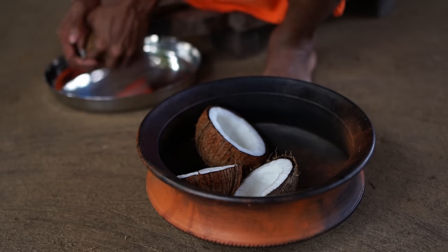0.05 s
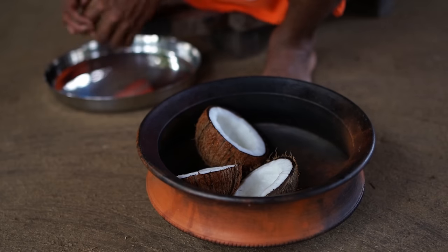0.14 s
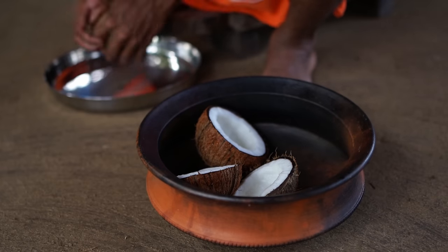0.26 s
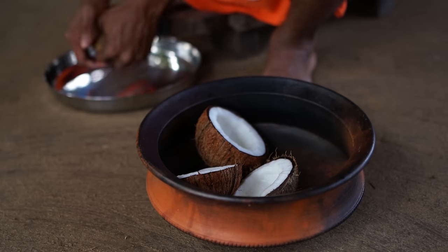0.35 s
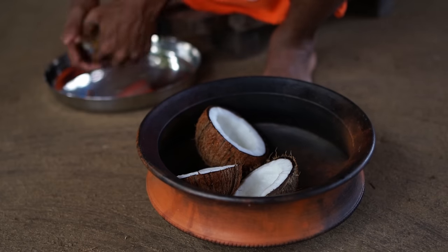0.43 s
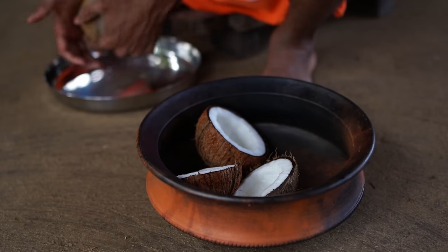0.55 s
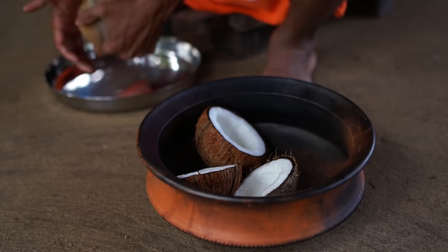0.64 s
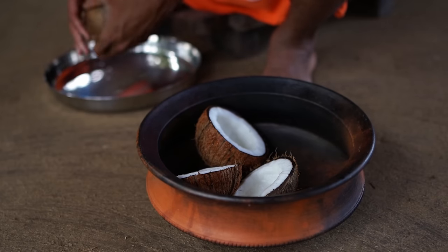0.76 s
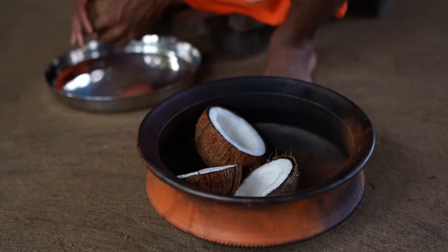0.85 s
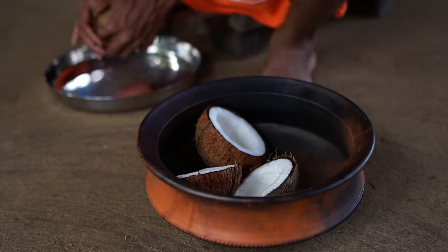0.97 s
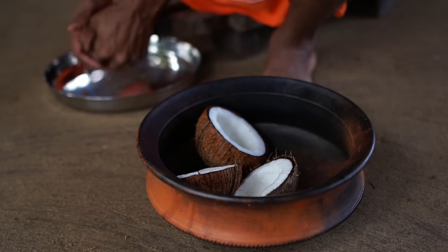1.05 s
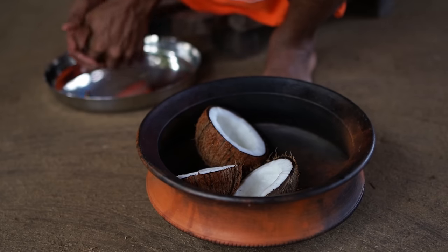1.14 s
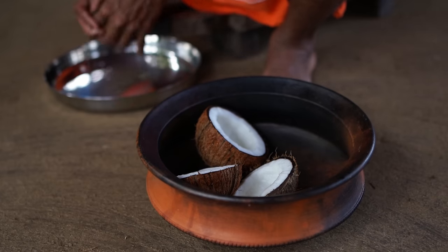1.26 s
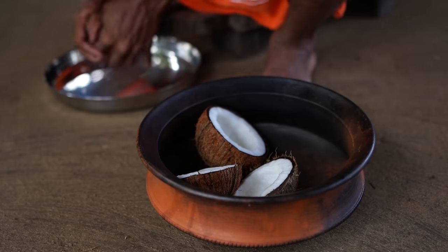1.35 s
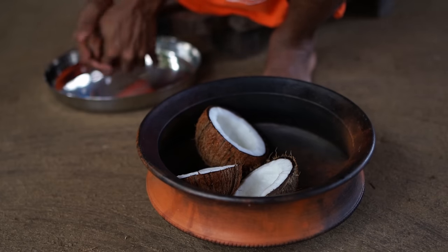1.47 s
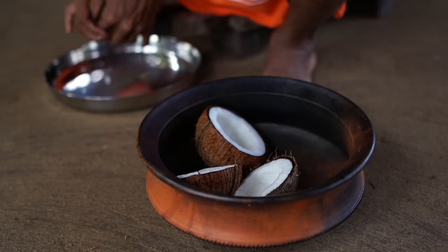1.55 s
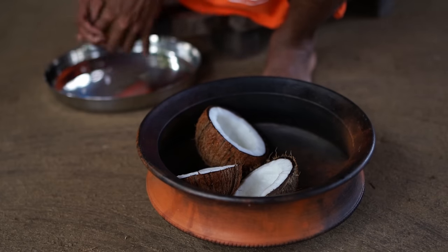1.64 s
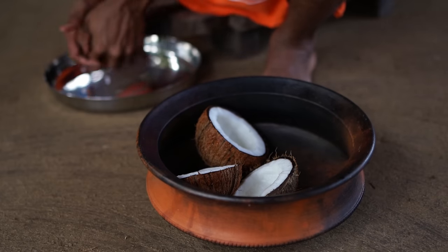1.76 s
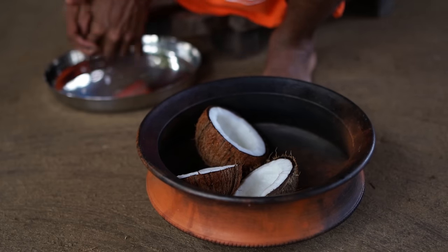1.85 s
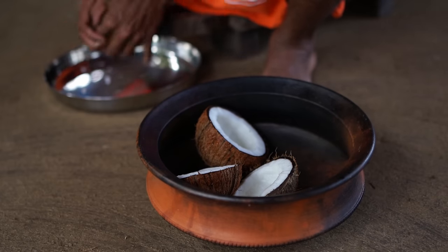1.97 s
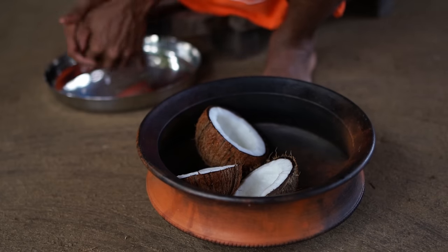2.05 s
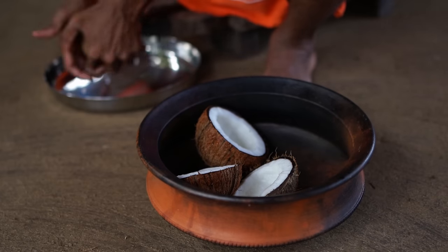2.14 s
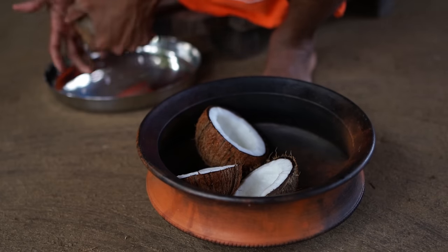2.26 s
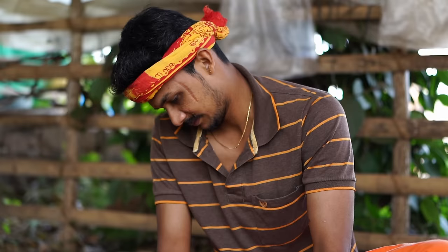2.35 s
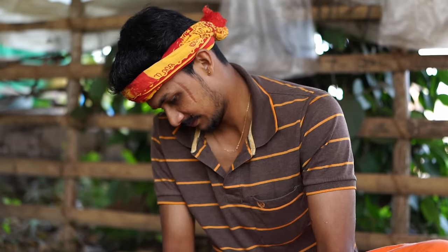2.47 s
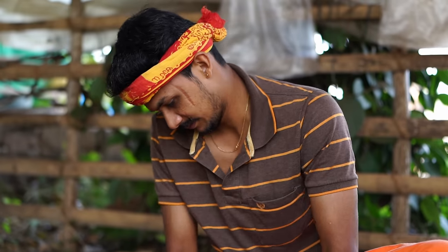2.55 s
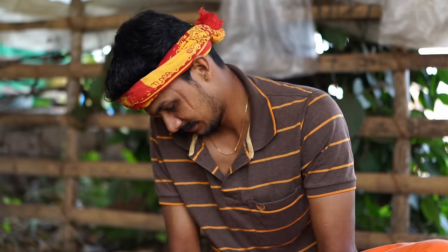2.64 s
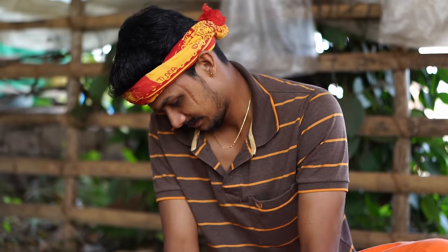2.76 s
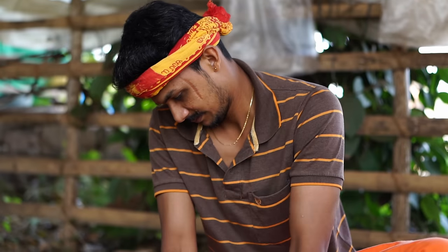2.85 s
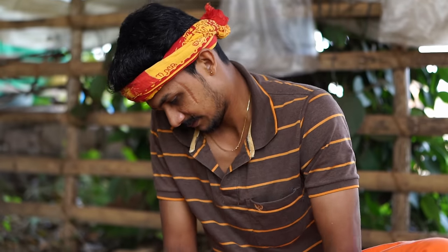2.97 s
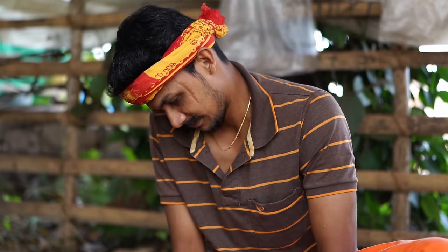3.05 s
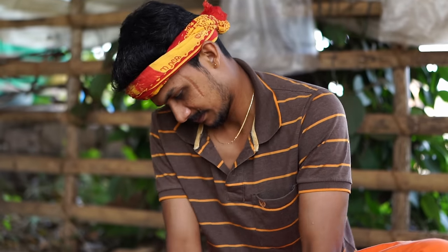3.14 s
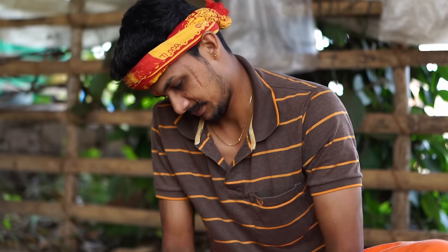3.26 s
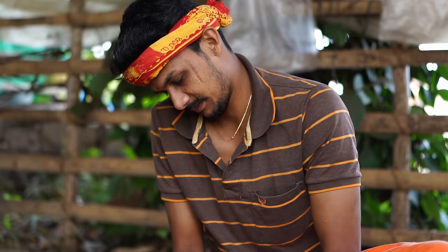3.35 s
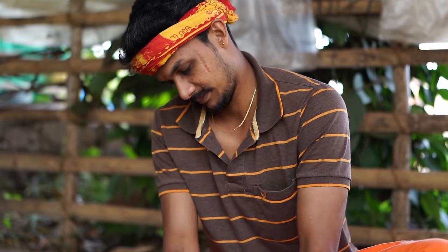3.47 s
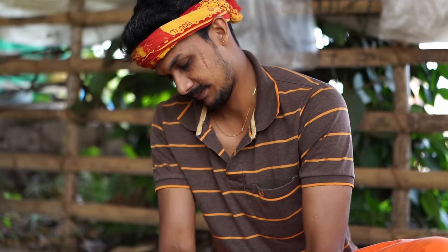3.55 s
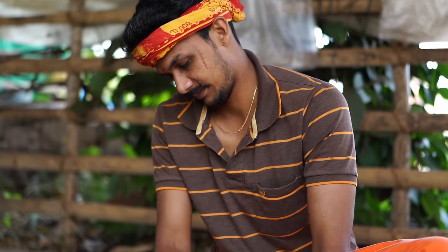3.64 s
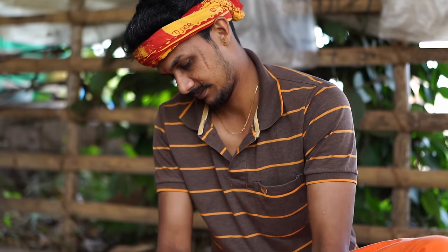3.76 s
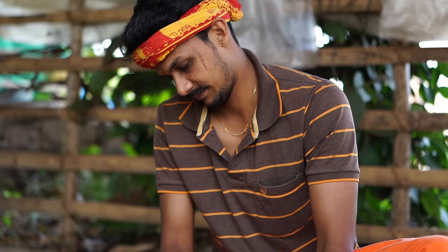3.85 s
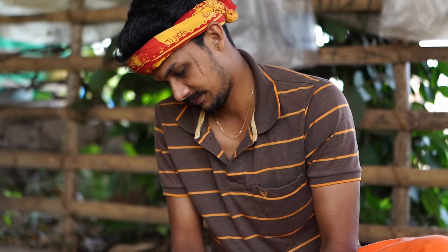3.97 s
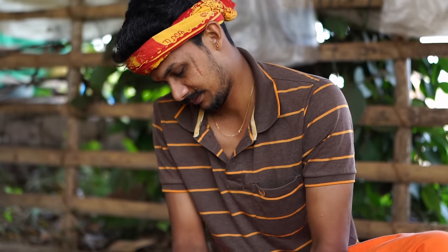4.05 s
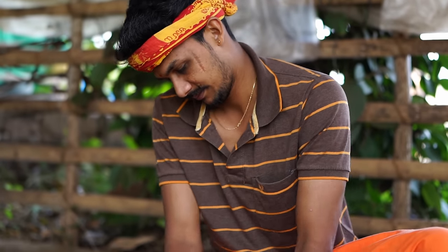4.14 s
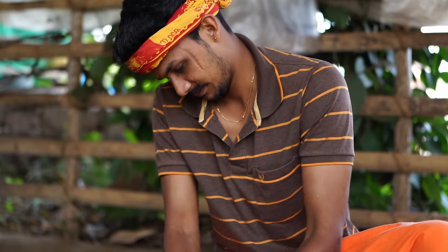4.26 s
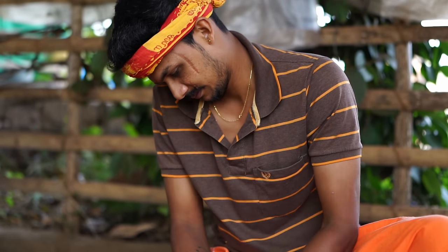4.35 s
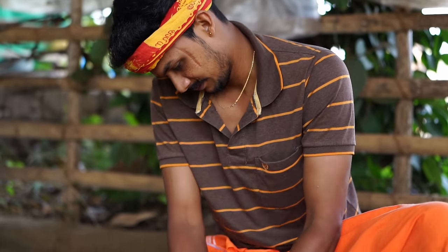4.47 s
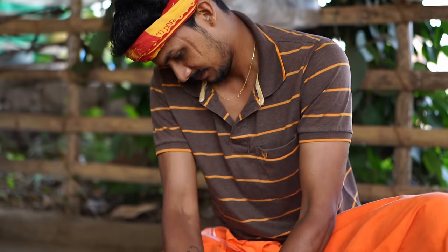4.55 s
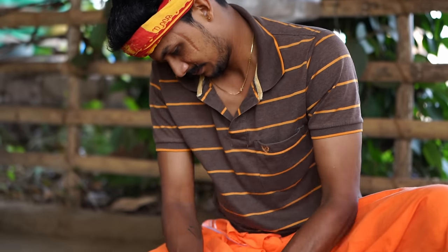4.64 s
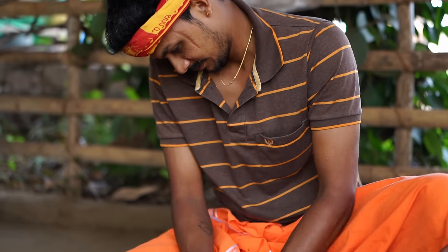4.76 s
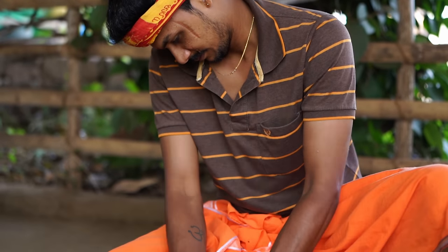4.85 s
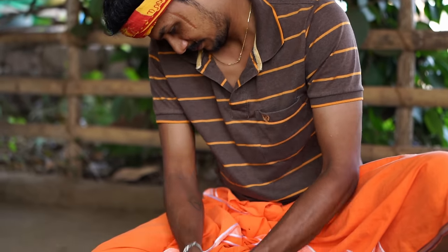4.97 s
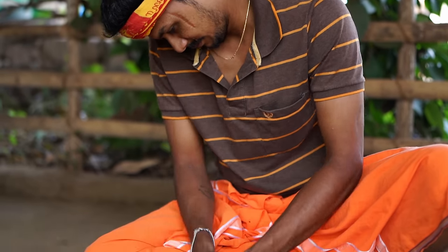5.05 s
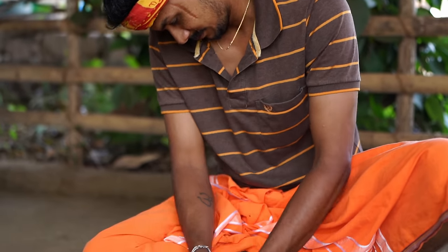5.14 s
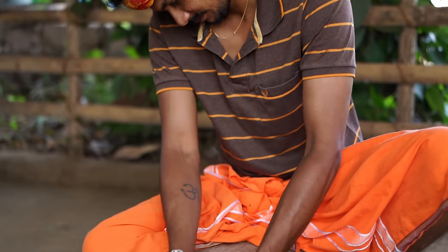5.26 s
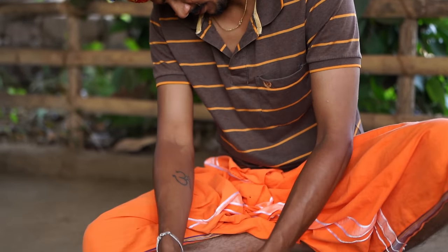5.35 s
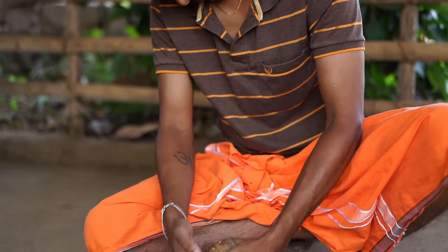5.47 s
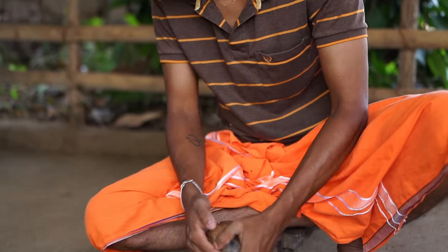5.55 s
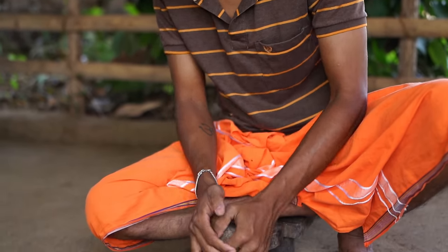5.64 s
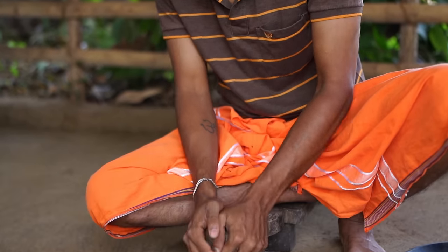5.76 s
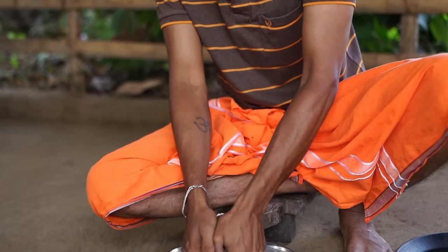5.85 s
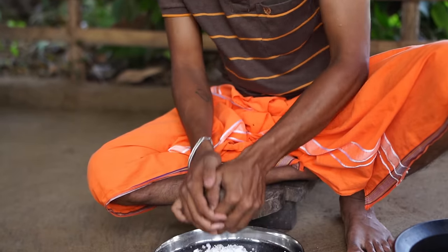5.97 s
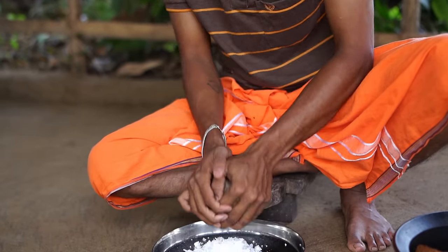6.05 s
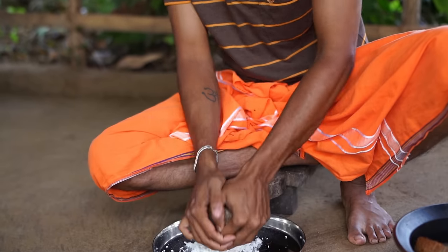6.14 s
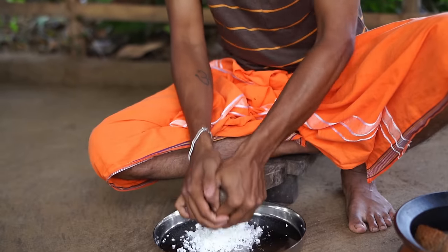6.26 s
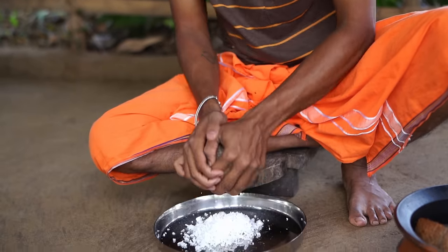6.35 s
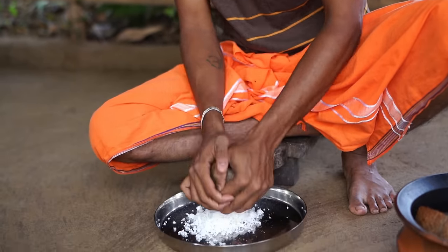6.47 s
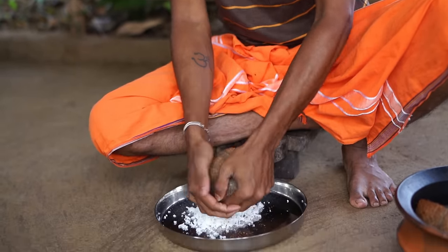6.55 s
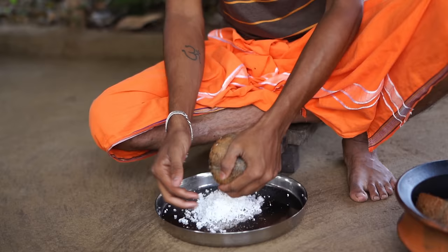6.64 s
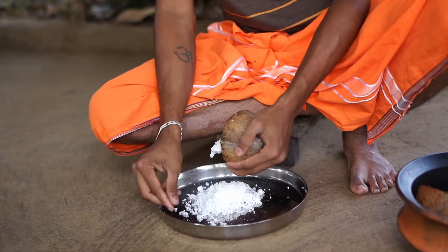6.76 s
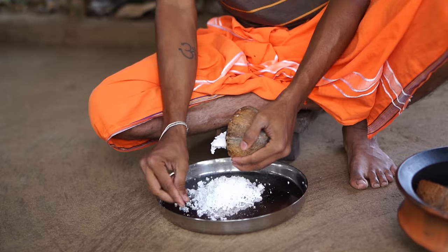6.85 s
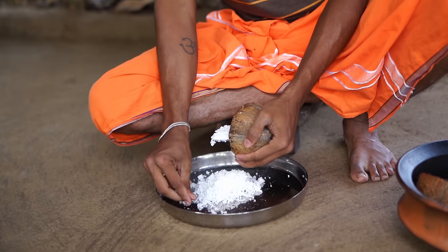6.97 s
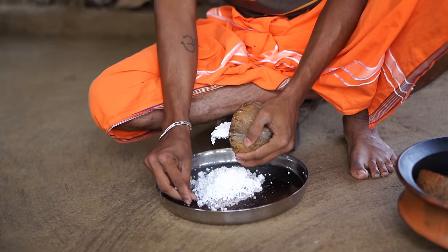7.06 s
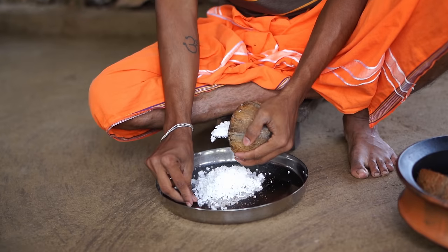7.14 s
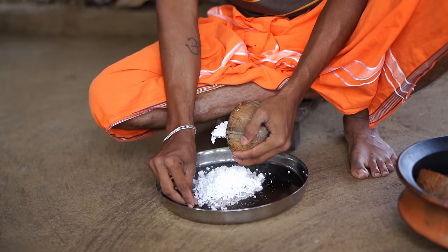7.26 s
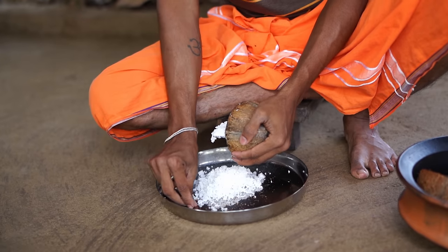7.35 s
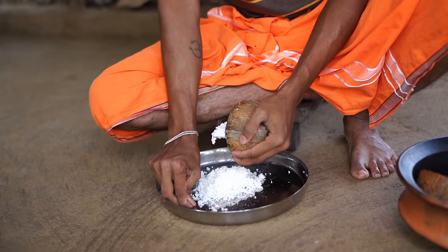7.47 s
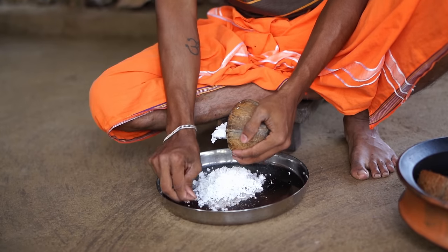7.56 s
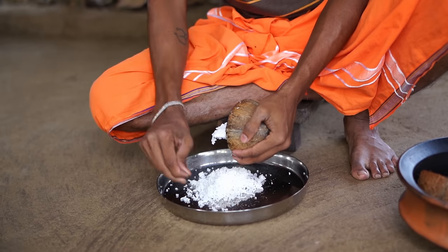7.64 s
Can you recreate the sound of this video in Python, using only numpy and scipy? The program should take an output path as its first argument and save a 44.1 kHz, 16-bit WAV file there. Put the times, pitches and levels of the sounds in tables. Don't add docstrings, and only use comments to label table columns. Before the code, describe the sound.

Close outdoor sound beside an open shed, with little reverberation. A stroke is already under way at 0 s; another bites at 0.2-0.4 s: coarse chattering rasps of coconut on steel teeth, with hollow shell knocks and torn-fibre hiss. A pause follows with rustle, small clicks and a near throbbing bird whistle at 0.6-0.8 s. Strokes return around 1.0, 1.35, 1.7 and 2.0 s, with a brief scuff at 1.5 s. At 2.4 s the listening place changes; light taps lead to rasps near 2.7, 3.05 and 3.4 s. After a gap with a soft scuff at 3.9 s, four come from 4.06 to 5.2 s. Taps and crumbs fill another pause, then three final strokes run 5.7-6.6 s. Low wind buffets the microphone, and faint bird calls continue to 7.6 s with a tiny tap at 7.2 s. Soft air, distant rumble and a faint engine underlie everything.

```python
import sys
import numpy as np
from scipy import signal
from scipy.fft import rfft, irfft
from scipy.io import wavfile
from scipy.ndimage import uniform_filter1d, minimum_filter1d

SR = 44100
rng = np.random.default_rng(int(sys.argv[2]) if len(sys.argv) > 2 else 0)


def master_out(mix):
    frames = np.transpose(np.atleast_2d(mix))
    ceiling = np.clip(frames, -1, 1)
    pcm = np.round(ceiling * 32767).astype(np.int16)
    wavfile.write(sys.argv[1], SR, pcm)


def volts_from_db(level):
    exponent = np.asarray(level, float) / 20
    return 10 ** exponent


N = 340011
CLOCK = np.arange(N) / SR
TICKS = CLOCK[::32]
MOVE_S = 2.4


def evened(x):
    return x / np.sqrt(np.mean(x ** 2) + 1e-20)


def read(points, hz):
    f, value = np.transpose(points)
    return np.interp(np.log(hz + 1), np.log(f + 1), value)


def band(x, lo_hz, hi_hz, order=2):
    sos = signal.butter(order, [lo_hz, hi_hz], "bandpass", fs=SR, output="sos")
    return signal.sosfilt(sos, x)


def coloured(points):
    hz = np.fft.rfftfreq(N, 1 / SR)
    spectrum = rfft(rng.standard_normal(N)) * volts_from_db(read(points, hz))
    return evened(irfft(spectrum, N))


def drift(hz):
    return evened(signal.lfilter([1], [1, -np.exp(-2 * np.pi * hz / SR)], rng.standard_normal(N)))


def resonate(x, hz, width_hz):
    turn = np.exp(2j * np.pi * np.cumsum(hz * np.ones(len(x))) / SR)
    r = np.exp(-np.pi * width_hz / SR)
    return 2 * (turn * signal.lfilter([1 - r], [1, -r], x / turn)).real


def swells(rows):
    each = [db - 10 * abs(TICKS - s) / spread_s for s, db, spread_s in rows]
    return np.interp(CLOCK, TICKS, np.max(each, axis=0))


def rasp():
    pressure, blade_db, tear_db, stool_db = effort()
    beat = np.cumsum(135 * volts_from_db(3.0 * drift(12))) / SR % 1
    chatter = evened(np.exp(-beat / 0.25595) - .29) + .5 * drift(32.19)
    coarse, fine = slips(1300, 1.5), slips(9000, 2.5)
    shell = evened((coarse + 0.3211 * fine) * volts_from_db(1.5 * chatter)) * volts_from_db(pressure - 3.0)
    gate = uniform_filter1d(abs(coarse), size=40)
    ripped = fine * (3.022 + evened(gate))
    blade = evened((1.767 * coarse + ripped) * volts_from_db(0.68 * chatter)) * volts_from_db(pressure + blade_db - 1.8)
    tearing = evened(ripped * volts_from_db(0.66 * chatter)) * volts_from_db(pressure + tear_db + 3.5)
    stool = evened(coarse * volts_from_db(1.0 * chatter)) * volts_from_db(pressure + stool_db - 2.5)
    return np.array([shell, blade, tearing, stool])


def slips(per_s, spread_db):
    size_db = spread_db * np.minimum(rng.exponential(1, N), 4)
    size = volts_from_db(size_db) * rng.choice([-1., 1.], N)
    return evened(size * (rng.random(N) < per_s / SR))


def effort():
    # touch_s, rise_s, hold_s, bite_db, sag_db
    strokes = [(-0.06, 0.059005, .055, -14.5, -14), (0.198, .02, .03, -33, 2), (0.228, .065, .08, -11, -15),
               (0.909, 0.04859, .07, -21, -3), (0.975, .04, .11, -15.5, -11),
               (1.309, 0.04734, .105, -12, -14), (1.636, 0.04572, .12, -14, -9), (1.96, .05, .115, -13, -6),
               (2.664, .055, .145, -13.5, -17), (3.025, .06, .11, -13, -11), (3.338, .05, .11, -12.5, -11),
               (3.894, 0.01306, .09, -39, -8), (4.058, 0.045756, .1, -11, -14),
               (4.398, .07, .09, -11.5, -13), (4.74, 0.0591, .085, -11.5, -13),
               (5.08, 0.035127, .115, -12.5, -13), (5.613, 0.04392, .08, -47, -4),
               (5.726, .045, .115, -13.5, -13), (6.066, .045, .115, -12.5, -17),
               (6.408, 0.046, .115, -15, -13)]
    # level_db at full pressure, share of each lost dB won back [dB/dB]
    blade_law = [
        (-6, 0.07474),
        (-11, 0.30432),
    ]
    tear_law = [
        (-21, 0.243),
        (-20, 0.3437),
    ]
    # level_db, slope_db_per_s
    stool_law = [
        (-4, -58.5),
        (-9, -43),
    ]
    # time_s, nearness_db, lean_db
    posture = [(0.03, 1.5, -13), (.3, 0, 3), (1.05, 2.5, 6), (1.4, -1, 0), (1.7, 0, -3), (2.05, -.5, -4),
               (3.1, 1, 1), (4.15, -4.5, -12), (4.5, 0, -1), (4.85, 3, -1), (5.15, 1.5, 2), (5.8, 0.5, -3),
               (6.15, 2.5, 2)]
    touch_db, lift_db_per_s = -25.5, -520
    full_db, tear_db_per_s = -10, -22

    each = np.array([shaped(*row, touch_db, lift_db_per_s) for row in strokes])
    pressure = each.max(axis=0)
    age_s = TICKS - np.array(strokes)[each.argmax(axis=0), 0]
    lost_db = np.minimum(full_db - pressure, 50)
    place = (TICKS >= MOVE_S).astype(int)
    blade, tear, stool = (np.array(law)[place].T for law in (blade_law, tear_law, stool_law))
    s, near_db, lean_db = np.transpose(posture)
    blade_db = blade[0] + blade[1] * lost_db
    tear_db = tear[0] + tear[1] * lost_db + tear_db_per_s * age_s + np.interp(TICKS, s, near_db)
    stool_db = stool[0] + stool[1] * age_s + .2 * lost_db + np.interp(TICKS, s, lean_db)
    return [np.interp(CLOCK, TICKS, db) for db in (pressure, blade_db, tear_db, stool_db)]


def shaped(s, rise_s, hold_s, db, sag_db, from_below_db, db_per_s, curve=1.799):
    t = TICKS - s
    rising = from_below_db * np.clip(1 - t / rise_s, 0, 1) ** curve
    sagging = sag_db * np.clip((t - rise_s) / hold_s, 0, 1) ** curve
    falling = db_per_s * np.maximum(t - rise_s - hold_s, 0)
    return np.where(t < 0, -5000, db + (rising + sagging) + falling)


def blows():
    # start_s, shell_db, blade_rel_db
    catches = [(0.003, -17, -4), (0.012, -18, -6), (0.268, -17, -13), (0.2888, -10, -11), (0.3026, -9, -11),
               (0.3179, -16, 1), (0.3338, -10, -11), (0.3486, -15, -8), (0.953, -26, -5), (0.999, -16, -6),
               (1.0063, -11, -7), (1.0381, -9, -2), (1.0542, -9, 0), (1.1109, -16, -20), (1.3415, -19, -3),
               (1.3534, -16, -4), (1.38, -18, 1), (1.401, -9, -14), (1.431, -12, -20), (1.69, -17, -6),
               (1.699, -10, -6), (1.7077, -17, 5), (1.7291, -21, 3), (1.7637, -10, -5), (1.772, -13, -8),
               (1.9847, -31, 9), (2.0166, -16, -2), (2.035, -15, 3), (2.0496, -19, 0), (2.0778, -14, -3),
               (3.047, -18, -13), (3.351, -27, -8), (4.414, -25, -10), (4.754, -24, -3), (6.123, -12, -2),
               (6.415, -29, -7),
               (2.6997, -17, -14), (2.7133, -15, -13), (2.732, -14, -16), (2.7454, -14, -16),
                     (2.7616, -16, -5), (2.7699, -24, 1), (2.7817, -17, -6), (2.7929, -15, -11),
                     (3.0668, -13, -8), (3.0887, -13, -9), (3.1063, -8, -11), (3.3176, -25, -14),
                     (3.368, -15, -14), (3.3822, -11, -12), (3.3965, -14, -13), (3.4102, -10, -15),
                     (3.4336, -9, -11), (4.1097, -8, -15), (4.1269, -11, -9), (4.141, -15, -11),
                     (4.1502, -12, -15), (4.1585, -11, -17), (4.1721, -14, -17), (4.1882, -11, -9),
                     (4.1959, -16, -6), (4.4577, -16, -14), (4.4684, -8, -17), (4.4946, -11, -13),
                     (4.5146, -14, -10), (4.7845, -16, -5), (4.7929, -12, -11), (4.8007, -13, -14),
                     (4.8087, -10, -16), (4.8242, -11, -16), (4.8339, -18, -9), (5.108, -13, -13),
                     (5.1217, -8, -18), (5.1354, -15, -7), (5.1558, -12, -12), (5.1841, -20, -11),
                     (5.7482, -18, -13), (5.7703, -11, -7), (5.7887, -20, -3), (5.8156, -18, -10),
                     (5.8395, -23, 0), (6.0998, -14, -13), (6.1179, -10, -6), (6.1387, -19, -5),
                     (6.1654, -18, -5), (6.4438, -17, -14), (6.4572, -17, -13), (6.4675, -15, -8),
                     (6.4884, -21, -1), (6.5225, -19, -12)]
    # start_s, peak_db, shell_rel_db, top_rel_db
    taps = [(0.203, -27.5, -10, -13), (0.61, -33.5, 0.5, -10), (0.8296, -42, 0, -3),
            (1.279, -30.5, -2.5, -9.5), (1.598, -41, 5, -9.5), (1.964, -29, -12, -10.5),
            (2.1783, -37, -13, -7.5), (2.2346, -34.5, -23, -11.5), (2.241, -45, -17, -4.5),
            (2.3039, -44.5, 4, -10), (2.5113, -48, -13.5, 2), (2.553, -42, -9, -8),
            (2.5935, -39.5, 4.5, -6.5), (3.0034, -27, -4, -11), (3.3175, -30, 13.5, -7),
            (3.8751, -34, 5.5, -8.5), (4.367, -27.5, 1.5, -8), (4.6839, -39.5, -17.5, -9),
            (4.7249, -30.5, -8.5, -14), (5.009, -36, -20.5, -25.5), (5.0702, -29.5, 1, -8),
            (5.344, -40, -20, -3.5), (5.4456, -37, -5, -9), (5.488, -46.5, -14, 5),
            (5.5434, -34, -24.5, -6), (5.653, -33, -2.5, -11), (6.0476, -28, 4.5, -3),
            (6.3831, -27, 4, -5.5), (7.2065, -41, -3, -10)]
    drives, t = np.zeros((4, N)), np.arange(400) / SR
    rise_s, dying_s = .001, .004
    for s, db, blade in catches:
        jerk = rng.standard_normal(len(t)) ** 3 * np.minimum(t / rise_s, 1) * np.exp(-t / dying_s)
        force_db = db + np.array([[12.0], [blade + 14.0], [blade + 10.5], [-12.0]])
        drives[:, round(s * SR):][:, :len(t)] += volts_from_db(force_db) * jerk / felt(jerk)
    for s, db, shell, top in taps:
        burst = rng.standard_normal(len(t)) * np.exp(-t / 0.005)
        force_db = db + np.array([[shell - 1.5], [-4.0], [top + 1.5], [shell - 9.0]])
        drives[:, round(s * SR):][:, :len(t)] += volts_from_db(force_db) * burst
    return drives


def felt(force):
    low, mid = band(force, 400, 1300), band(force, 1500, 5500)
    return np.linalg.norm([low, mid, force, low], axis=1)[:, None]


def struck(drives):
    # freq_hz, level_db per Hz
    colour_a = [(59, -47), (100, -26), (188, -30.5), (243, -8), (355, -11.5), (468, -3.5), (670, -3.5),
                (939, 0), (1260, -7), (1400, -15.5), (2140, -14), (3070, -14.5), (13500, -37.5),
                (15600, -41.5)]
    # freq_hz, width_hz, level_db
    modes_a = [(270.73, 58.12, -6), (900.54, 35.8, 5), (1222.8, 120.3, 2.5), (1530.3, 83, -6),
               (2096.4, 521.8, -5.5), (3650, 559, -14.5), (4500, 460, -16.5), (5413.1, 270, -19),
               (13507, 370, -32)]
    # freq_hz, level_db per Hz
    colour_b = [(59, -66), (100, -26), (188, -17.5), (243, -8), (306, -10), (379, -2), (578, -9), (713, -8),
                (980, -2), (1460, -18.5), (4580, -17), (6160, -27), (13200, -39), (15600, -41)]
    # freq_hz, width_hz, level_db
    modes_b = [(484.44, 57.33, -1.5), (727.46, 308.23, 1.5), (1844.7, 100, -12.5), (2273.1, 53.85, -14),
               (3187.8, 214.7, -14), (3669.6, 170, -15.5), (4501.5, 290, -17), (9485.5, 210, -27.5),
               (13018, 480, -35)]
    first = CLOCK < MOVE_S
    out = np.zeros(N)
    for on, parts in ((first, knock(colour_a, modes_a)), (~first, knock(colour_b, modes_b))):
        for drive, part in zip(drives, parts):
            out += signal.oaconvolve(drive * on, part)[:N]
    return out


def knock(colour, modes, between_db=1.5):
    hz = abs(np.fft.fftfreq(8192, 1 / SR))
    power = volts_from_db(read(colour, hz) + between_db) ** 2
    for f, width_hz, db in modes:
        power += volts_from_db(db) ** 2 / (1 + (2 * (hz - f) / width_hz) ** 2) ** 2
    a, b, c = (1 / (1 + (hz / edge_hz) ** 8) for edge_hz in (330, 1500, 5500))
    parts = []
    for share in (abs(b - a), abs(c - b), 1 - c, a):
        log_size = .5 * np.log(power * share + 1e-11)
        part = np.fft.ifft(np.exp(np.conj(signal.hilbert(log_size)))).real[:3000]
        parts.append(part / np.linalg.norm(part))
    return parts


def gripped(x, patchy_db=2.0):
    z = signal.stft(x, nperseg=256, noverlap=192)[2]
    patches = rng.standard_normal(z.shape[::-1]).T
    patches = uniform_filter1d(patches, size=3, axis=0)
    patches = evened(uniform_filter1d(patches, size=14, axis=1))
    return signal.istft(z * volts_from_db(patchy_db * patches - .8), nperseg=256, noverlap=192)[1][:N]


def singing():
    # middle_s, length_s, pitch_hz, level_db
    rings = [(.05, .09, 3600, -37), (3.17, .08, 2400, -35), (3.17, .1, 4300, -35), (4.55, .1, 4000, -35),
             (4.53, .08, 2300, -36), (4.87, .1, 4300, -35), (4.86, .06, 2200, -36), (5.23, .07, 3200, -39),
             (6.19, .1, 2600, -36), (.275, .06, 3150, -33), (.28, .04, 5400, -36), (.32, .07, 1950, -30),
             (.95, .07, 3700, -33), (1.05, .07, 2600, -26), (1.04, .09, 4800, -34), (1.39, .12, 2750, -31),
             (1.72, .14, 1750, -30), (1.73, .12, 5300, -38), (2.05, .14, 2150, -29), (2.05, .14, 4350, -32),
             (2.76, .15, 2150, -35), (2.76, .15, 3900, -35), (3.11, .13, 2350, -32), (3.12, .13, 4400, -34),
             (3.43, .12, 2300, -33), (3.43, .08, 5000, -34), (4.15, .14, 2900, -34), (4.49, .12, 4650, -33),
             (4.8, .12, 1750, -32), (5.16, .12, 4550, -33), (5.16, .12, 3000, -35), (5.79, .1, 3600, -34),
             (6.125, .05, 3550, -26), (6.48, .12, 3050, -34)]
    width_hz = 480
    out, ripping = np.zeros(N), slips(2500, 2.5)
    for s, length_s, hz, db in rings:
        at, n = round((s - length_s / 2) * SR), round(length_s * SR)
        ring = resonate(resonate(ripping[at:at + n], hz, width_hz), hz, width_hz)
        out[at:at + n] += volts_from_db(db) * evened(ring) * np.hanning(n)
    return out


def crumbs():
    # start_s, level_db, dying_s, lowest_hz, highest_hz
    puff_rows = [(0.472, -47, .012, 5000, 15500), (0.52, -52, .006, 5000, 15500),
                 (0.662, -33, .003, 6000, 10000), (0.676, -42, .005, 5000, 15500),
                 (0.679, -29, .005, 5200, 6200), (0.749, -31, .002, 6000, 15500),
                 (0.822, -39, .02, 4500, 15500), (0.832, -36, .004, 10500, 15500),
                 (1.19, -46, .004, 6500, 10000), (1.495, -25, .02, 700, 1600),
                 (1.515, -15, .025, 1700, 2000), (1.52, -10, .022, 1050, 1300),
                 (1.6, -48, .015, 5000, 15500), (1.857, -42, .003, 2000, 6000),
                 (2.177, -39, .01, 4500, 15500), (2.231, -44, .002, 8000, 15500),
                 (2.303, -38, .002, 6500, 15500), (2.345, -53, .04, 5000, 15500),
                 (2.51, -46, .01, 8000, 15500), (2.983, -44, .01, 3000, 15500),
                 (3.84, -48, .005, 5000, 15500), (3.9, -23, .025, 750, 1250),
                 (5.008, -23, .025, 1700, 2000), (5.303, -48, .005, 7000, 15500),
                 (5.343, -37, .002, 7000, 10500), (5.352, -50, .003, 11000, 15500),
                 (5.46, -46, .003, 13000, 15500), (5.487, -39, .012, 11000, 15500),
                 (5.488, -28, .006, 8300, 9000), (5.54, -46, .006, 10000, 15500),
                 (6.75, -56, .07, 6000, 15500), (7.61, -57, .02, 7000, 15500)]
    out, t = np.zeros(N), np.arange(6000) / SR
    for s, db, dying_s, lo_hz, hi_hz in puff_rows:
        hiss = band(rng.standard_normal(len(t)), lo_hz, hi_hz)
        puff = volts_from_db(db) * hiss * np.minimum(t / (.2 * dying_s), 1) * np.exp(-t / dying_s)
        part = out[round(s * SR):][:len(t)]
        part += puff[:len(part)]
    return out


def rustle():
    # middle_s, level_db, spread_s (to come and go by 10 dB)
    moves = [(0.43, -55, 0.218), (0.68, -55.5, 0.1293), (0.85, -52.5, 0.1607), (1.28, -54, 0.1241),
             (1.48, -53, .04), (2.19, -51, 0.0499), (2.374, -58, 0.0414), (2.62, -53, 0.0961),
             (3.02, -47, 0.0469), (4.39, -49, 0.0307), (4.73, -50, 0.0149), (3.56, -61, 0.6064),
             (3.92, -53, 0.1741), (5.28, -59, 0.2193), (5.49, -55, 0.162), (5.7, -54.5, 0.1586),
             (6.8, -62.5, 0.002)]
    # freq_hz, level_db per Hz
    tone = [(180, -51.5), (300, -1.5), (384, -8.5), (461, -4), (611, -7.5), (15600, -25.5)]
    crackle = evened(signal.lfilter([1], [1, -.985], abs(slips(46, 3.3))))
    return coloured(tone) * (0.9 + .07 * crackle) * volts_from_db(swells(moves) + 7.0 + 2.2 * drift(40))


def shed(x):
    # freq_hz, t60_s
    dying = [(200, 0.1597), (1000, 0.14858), (4000, 0.09835), (12000, 0.11031)]
    taps = np.zeros(SR // 2)
    at = np.arange(200, len(taps) - 20, 20)
    taps[at + rng.integers(0, 20, len(at))] = rng.choice([-1., 1.], len(at))
    hz, t, z = signal.stft(taps, SR, nperseg=256)
    tail = signal.istft(z * volts_from_db(-60 * t / read(dying, hz)[:, None]), SR, nperseg=256)[1]
    return signal.fftconvolve(x, tail / np.linalg.norm(tail))[:N]


def birds():
    # time_s, pitch_hz
    near_pitch = [
        (0.09, 2881),
        (0.16, 2740),
        (0.6, 3190),
        (0.7, 3150),
        (0.75, 3170),
    ]
    # middle_s, level_db, spread_s (to come and go by 10 dB)
    throbs = [(.102, -38, .008), (.12, -43, .008), (.145, -50, .012), (.6306, -31, .006),
              (.6417, -27, .009), (.6588, -30, .005), (.6766, -26, .007), (.692, -34, .006),
              (.7039, -29, .011), (.72, -36, .005), (.74, -44, .01), (.76, -42, .015), (.815, -47, .02)]
    # start_s, length_s, first_hz, last_hz, level_db
    hoarse = [(0.452, 0.07, 3255, 3225, -47), (0.455, 0.05, 3650, 3450, -51),
              (0.088, 0.04, 2850, 2750, -54), (0.469, 0.0923, 3950, 4151, -56),
              (0.597, 0.08847, 2762, 2726, -47.5), (1.535, 0.1, 3200, 3250, -54),
              (1.545, 0.07, 3500, 3650, -54), (6.81, 0.05494, 2497, 3105, -65),
              (6.97, 0.0796, 3790, 3277, -58), (7.063, 0.07, 3727, 3916, -54.5),
              (7.207, 0.045, 2410, 3340, -53), (7.221, 0.05904, 3391, 3874, -52),
              (7.359, 0.03, 4150, 3650, -54), (7.38, 0.05, 3720, 3620, -56), (7.29, 0.06, 3100, 2800, -58),
              (7.49, 0.06855, 3650, 3494, -55), (7.562, 0.06904, 2859, 3076, -57.5)]
    clear = [(3.28, 0.05295, 3603, 3590, -54), (3.74, 0.13, 672, 665.5, -51),
             (6.682, 0.0599, 4019, 3988, -66), (6.66, 0.06, 1180, 1150, -62),
             (6.72, 0.085, 1149, 1130, -55), (7.6, 0.06, 3080, 3060, -62), (7.286, 0.06, 3620, 3610, -58),
             (7.305, 0.03306, 3015, 2796, -60), (7.39, 0.085, 3295, 3280, -57),
             (7.41, 0.06, 3680, 3601, -59), (6.83, 0.0484, 3404, 3502, -63),
             (6.86, 0.03564, 3713, 3723, -63), (7.573, 0.02835, 2674, 2754, -61)]
    turns = np.cumsum(np.interp(CLOCK, *np.transpose(near_pitch)) + 30 * drift(90)) / SR
    out = np.sin(2 * np.pi * turns) * volts_from_db(swells(throbs) + 3.0)
    for calls, blur in ((hoarse, .09), (clear, 0.02376)):
        for s, length_s, hz0, hz1, db in calls:
            n = round(length_s * SR)
            glide = np.linspace(hz0, hz1, n)
            width_hz = blur * hz0
            call = evened(resonate(resonate(rng.standard_normal(n), glide, width_hz), glide, width_hz))
            part = out[round(s * SR):][:n]
            part += volts_from_db(db) * call * signal.windows.tukey(n, .4)
    echo = rng.standard_normal(8000) * volts_from_db(-60 * np.arange(8000) / SR / 0.3193)
    return out + volts_from_db(-4) * signal.oaconvolve(out, echo / np.linalg.norm(echo))[:N]


def wind():
    # middle_s, level_db, spread_s (to come and go by 10 dB)
    gust_rows = [(0.7, -48.5, 0.11), (1.4, -46, 0.819), (2.6, -34, .1), (2.85, -36.5, 0.2204),
                 (3.27, -29, 0.2788), (4.3, -40, 2.5), (5.28, -35, 0.3913), (5.75, -35, .5),
                 (6.25, -34, 0.4036), (6.95, -30, 0.2503), (7.6, -29.5, 0.157)]
    puff_rows = [
        (6.36, -41, 0.0618),
        (6.76, -42, 0.1038),
        (7.36, -43.5, 0.0609),
    ]
    rumble_rows = [(0.13, -44.5, 1.503), (2.08, -47, 0.725), (3.24, -42.5, 0.7435), (5.1, -44, 1.539),
                   (6.7, -41.5, 0.493), (7.7, -43, 0.377)]
    # multiple of the firing rate, level_db
    engine_rows = [(3, -64), (4, -57), (5, -56.5), (6, -54), (7, -58), (8, -63), (9, -58.5)]
    # freq_hz, level_db per Hz
    air_tone = [(88, -66), (150, -3.5), (333, -9), (420, -14), (657, -13), (767, -15.5), (1490, -19),
                (3700, -21), (6020, -30.5), (15600, -40.5)]
    gusts = rng.standard_normal(N)
    low_a = evened(band(gusts, 9.9, 55))
    low_b = evened(band(gusts, 9.5367, 18.726, order=4))
    buffets = np.where(CLOCK < MOVE_S, low_a, low_b) * volts_from_db(swells(gust_rows))
    puffs = evened(band(gusts, 35.02, 93.4)) * volts_from_db(swells(puff_rows))
    rumble = evened(band(rng.standard_normal(N), 65.684, 140.87, order=3)) * volts_from_db(swells(rumble_rows) - 4.5)
    turns = np.cumsum(19.3 + 0.096 * drift(0.2472)) / SR
    engine = np.zeros(N)
    for k, db in engine_rows:
        engine += volts_from_db(db + 1.7 * drift(1.5)) * np.sin(2 * np.pi * (k * turns + rng.random()))
    air = volts_from_db(-50.5 + 0.54 * drift(9)) * coloured(air_tone)
    return buffets + puffs + rumble + engine + air


def scene():
    work = gripped(struck(rasp() + blows())) + singing()
    work = band(work, 125, 15700, order=3)
    return (work + volts_from_db(-10) * shed(work) + crumbs() + rustle() + birds() + wind())[None]


def band_limit(x):
    return signal.sosfilt(signal.butter(12, 15750, fs=SR, output="sos"), x)


def record(dry):
    room = np.minimum(.85 / (abs(dry) + 1e-9), 1)
    gain = uniform_filter1d(minimum_filter1d(room, size=129), size=65)
    return band_limit(dry * gain)


dry = scene()
out = record(dry)
master_out(out)
```